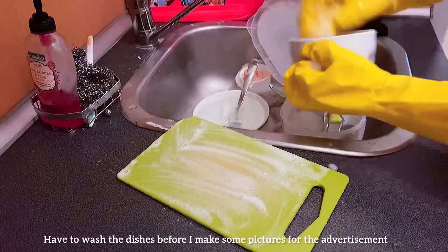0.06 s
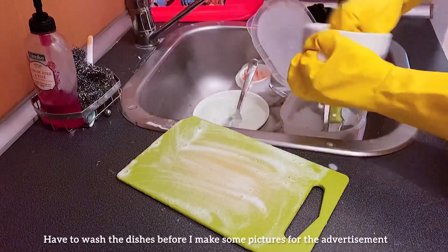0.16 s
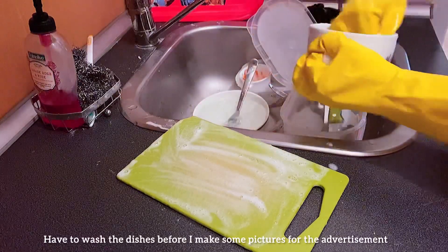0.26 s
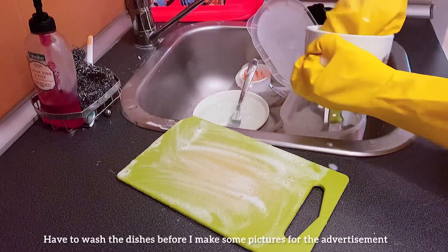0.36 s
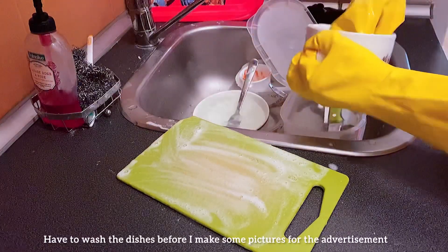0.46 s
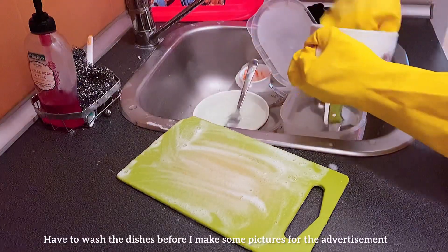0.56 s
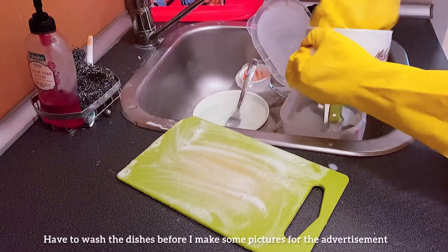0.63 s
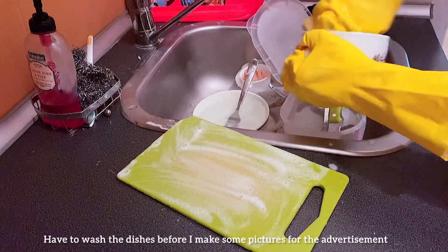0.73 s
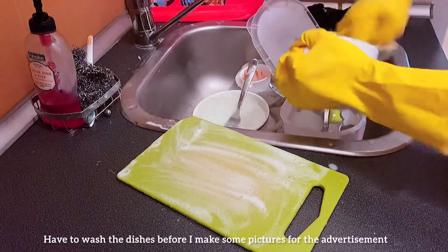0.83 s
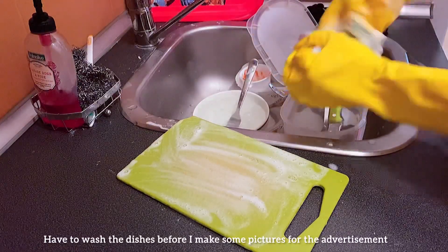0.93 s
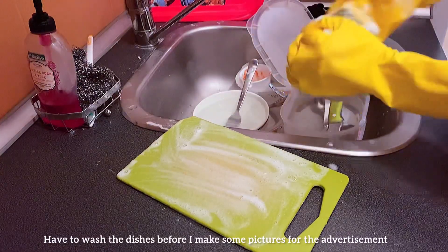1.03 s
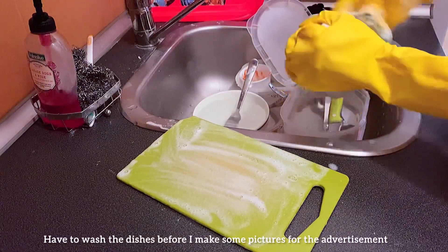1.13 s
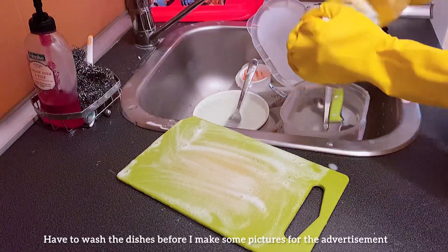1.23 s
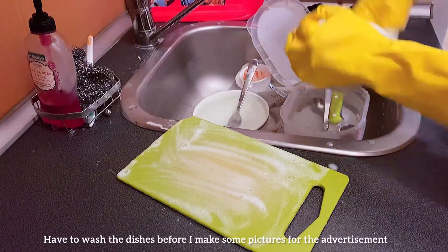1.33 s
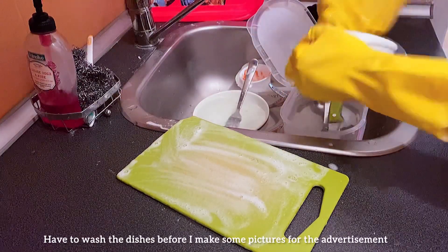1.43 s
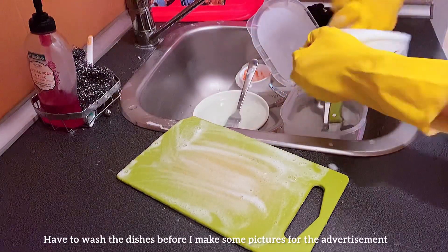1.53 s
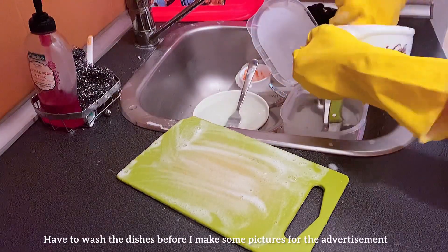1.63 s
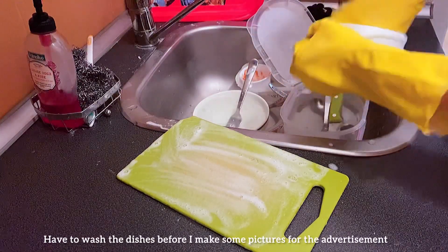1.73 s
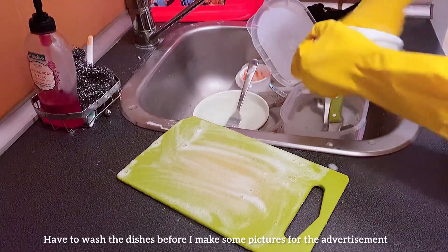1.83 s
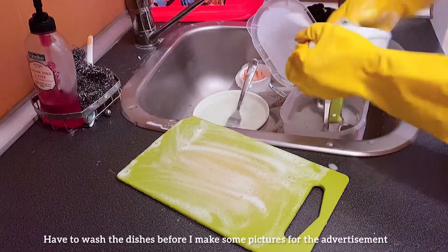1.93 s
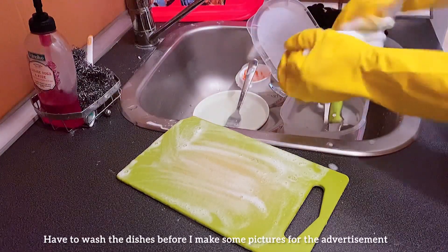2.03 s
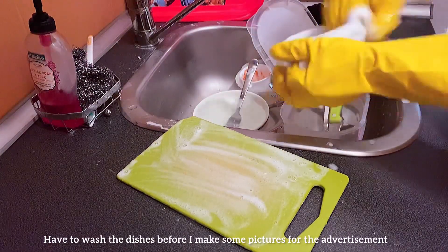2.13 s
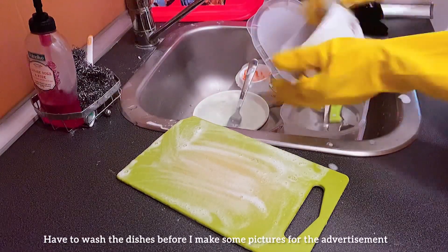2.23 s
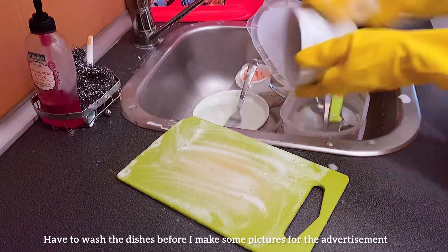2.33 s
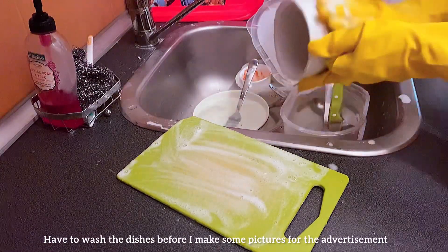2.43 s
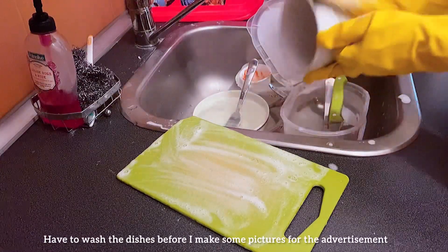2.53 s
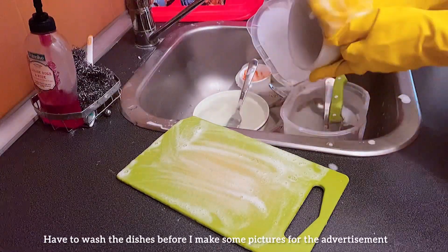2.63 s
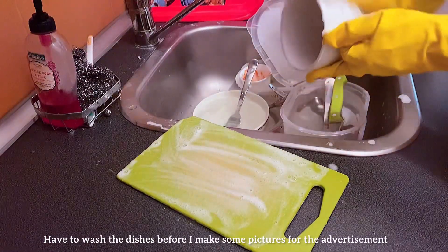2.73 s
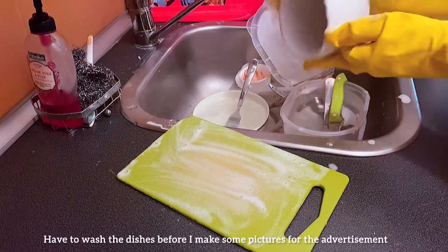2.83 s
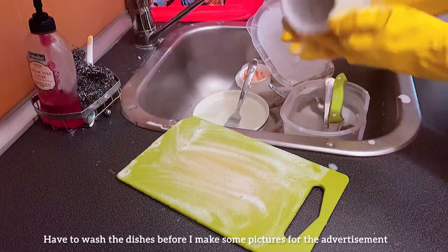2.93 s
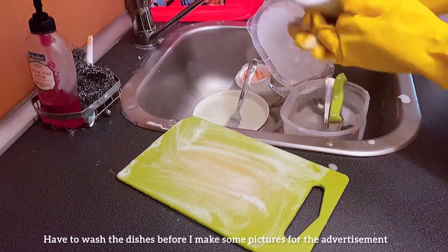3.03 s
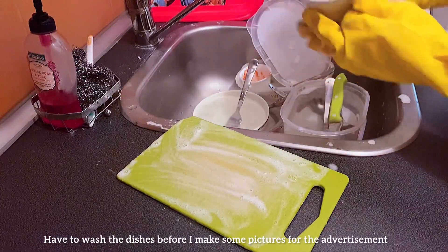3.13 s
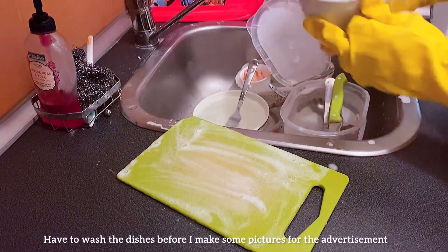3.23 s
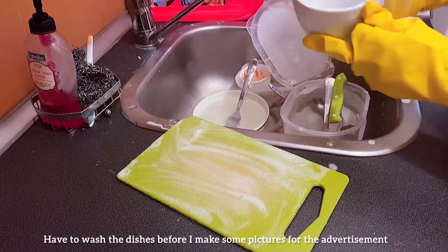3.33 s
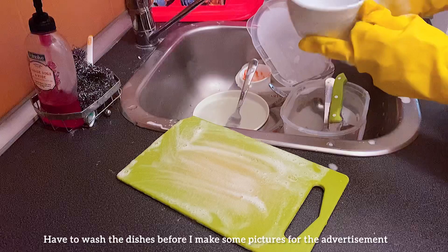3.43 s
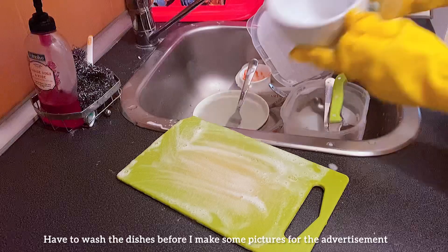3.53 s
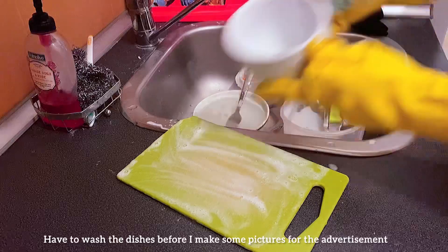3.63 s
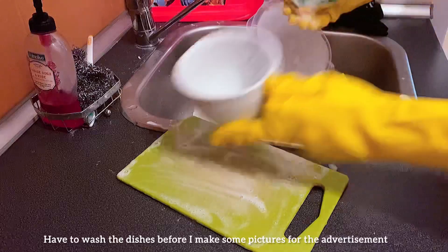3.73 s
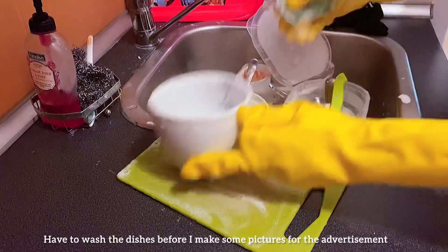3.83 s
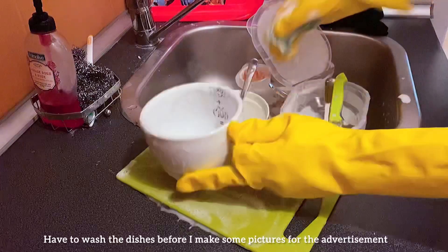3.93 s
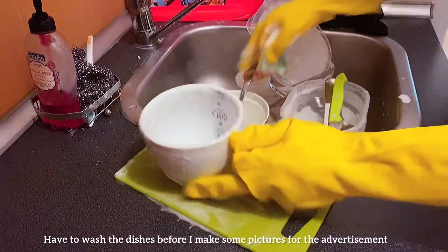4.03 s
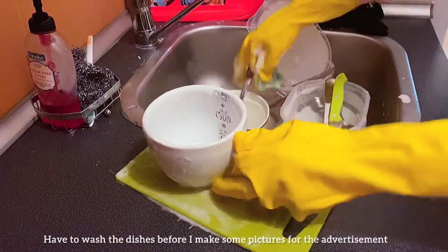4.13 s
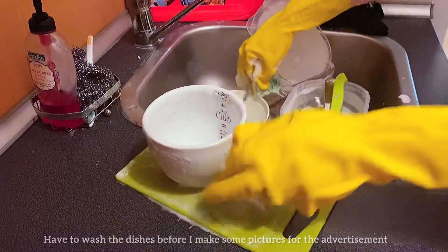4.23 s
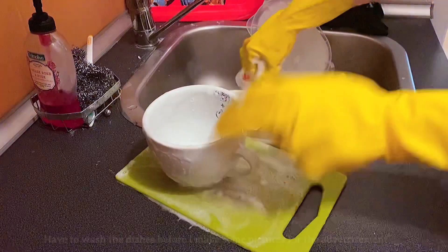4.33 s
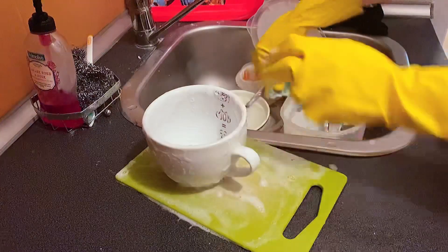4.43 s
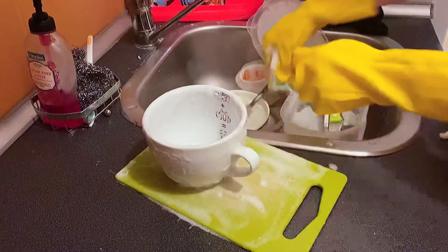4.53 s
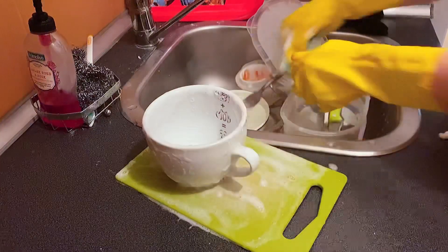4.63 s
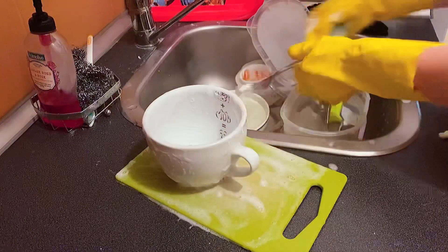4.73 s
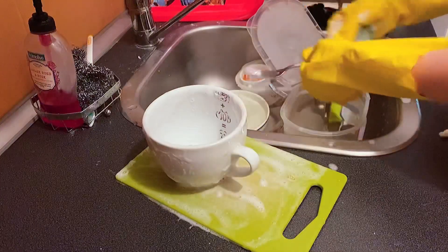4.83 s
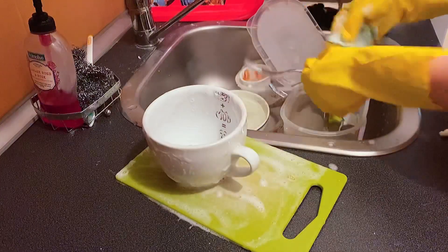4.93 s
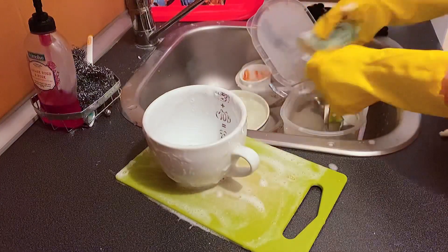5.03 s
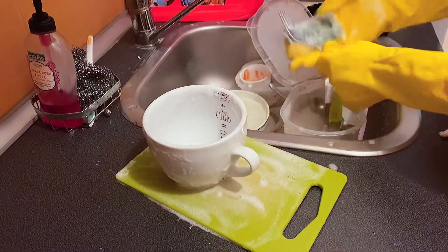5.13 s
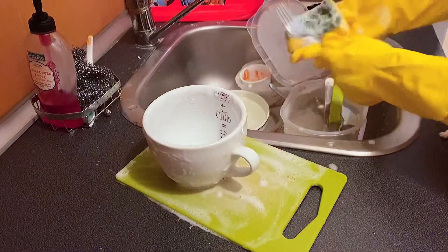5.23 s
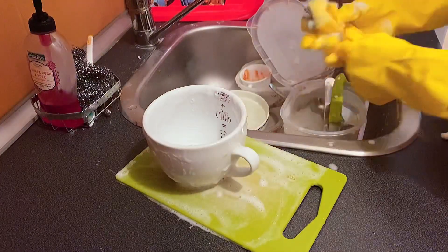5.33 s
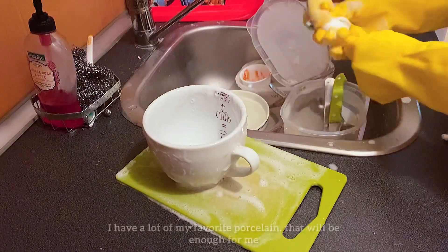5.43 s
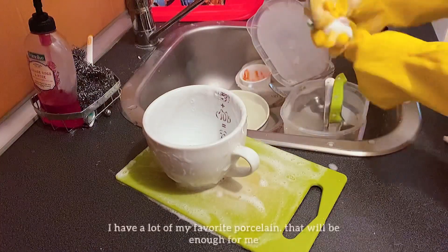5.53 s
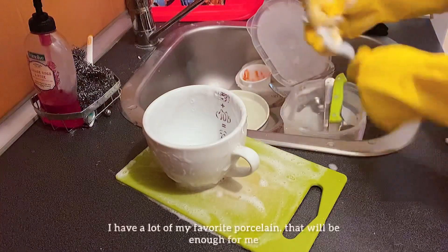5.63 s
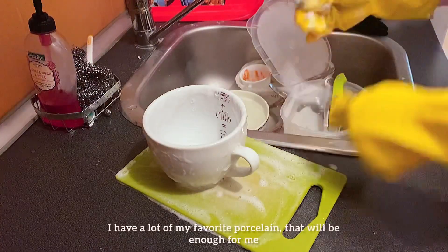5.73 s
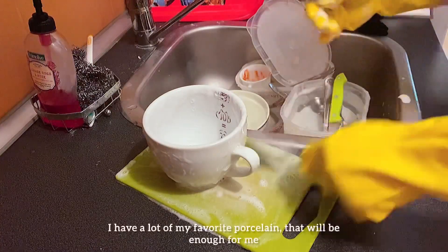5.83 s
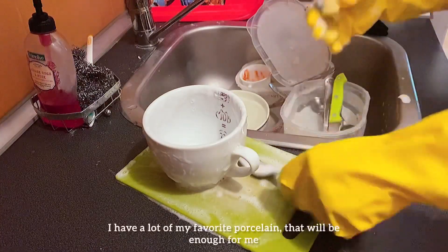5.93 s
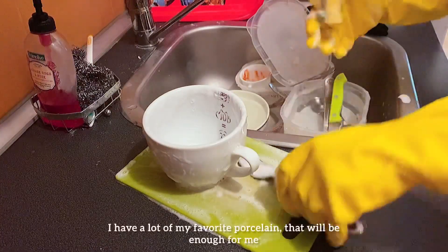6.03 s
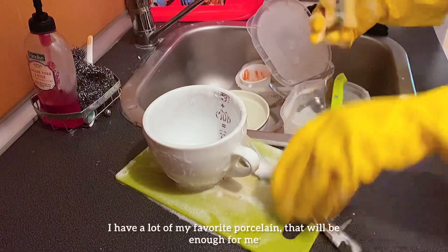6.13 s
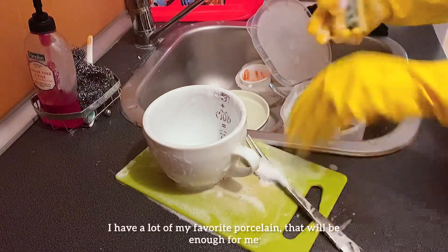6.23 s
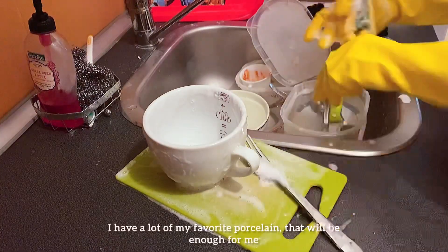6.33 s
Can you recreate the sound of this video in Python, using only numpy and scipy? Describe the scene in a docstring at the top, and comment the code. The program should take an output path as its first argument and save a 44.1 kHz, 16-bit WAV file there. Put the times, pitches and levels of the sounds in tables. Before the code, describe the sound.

A wet sponge scrubs a porcelain cup in squeaky, foamy strokes, then the cup knocks onto a plastic board, a fork clinks, and cutlery clatters down.

```python
"""Washing up at a kitchen sink

Gloved hands work a soapy sponge over a porcelain cup, then over cutlery: grains of noise swell with each stroke,
foam squelches as gliding narrow noise, and suds snap and pop. The cup is set down on a plastic board on the worktop,
a fork clinks against a dish as it is picked up, and the cutlery is dropped beside the cup: struck modes
with noisy cracks. A short dense echo and a quiet room tone surround it all."""
import sys
import numpy as np
from scipy import signal
from scipy.fft import rfft, irfft
from scipy.io import wavfile

SR = 44100
rng = np.random.default_rng(int(sys.argv[2]) if len(sys.argv) > 2 else 0)


def waveform_to_disk(signal):
    """Save audio, clipped to [-1, 1], as 16-bit WAV at the path in sys.argv[1]."""
    frames = np.transpose(np.atleast_2d(signal))
    scaled = np.clip(frames, -1, 1) * 32767
    samples = np.round(scaled).astype(np.int16)
    wavfile.write(sys.argv[1], SR, samples)


N = 281358
TIME = np.arange(N) / SR


def sponge(patchy_db, judder_db, fizz_growth, body_db, rub_db, hiss_db, fizz_db, suds_db):
    """Pores slip and foam bursts in dense grains; hard squeezes add a fine fizz on top."""
    # Spectrum of the wet sponge. Each row: frequency in Hz, relative level in dB per Hz.
    sponge_spectrum = [(90, 0.5), (190, -4.5), (260, -16.5), (480, -0.5), (800, 18), (1250, 14), (1800, 21),
                       (4400, 14), (7500, 5.5), (11000, -17.5), (16000, -41)]
    # Low body of the rubbing. Each row: time in seconds, relative level in dB.
    body_levels = [(.1, -4.5), (.55, -0.5), (1.0, -7), (1.35, -4.5), (2.3, -7), (3.3, -12), (3.68, -30),
                   (4.0, -11.5), (4.9, -3), (5.8, -10.5)]
    # Bursting micro-bubbles. Each row: frequency in Hz, relative level in dB.
    fizz_spectrum = [(5000, -22), (11000, 0.5), (16000, -14)]
    level, hiss = scrubbing()
    body = np.interp(TIME, *np.transpose(body_levels))
    judder = judder_db * drift(70)   # rubber and sponge stick and slip
    foam = [coloured(grains(3500, 2.85), sponge_spectrum) for _ in range(2)]

    def zone(low_hz, high_hz, count):
        """Neighbouring pore sizes swell and fade on their own."""
        edges = np.geomspace(low_hz, high_hz, count + 1)
        total = 0
        for k in range(count):
            patch = band(foam[k % 2], edges[k], edges[k + 1])
            total = total + patch * from_db(patchy_db * drift(50))
        return rms_one(total)

    low = from_db(body + body_db) * zone(109, 406, count=3)
    rub = from_db(rub_db) * zone(388, 4090, count=8)
    high = from_db(hiss + hiss_db) * zone(3970, 8070, count=4)
    # the fizz falls off faster than the rubbing when the pressure eases
    fizz_level = hiss + fizz_db + fizz_growth * (level - level.max())
    fizz = from_db(fizz_level) * coloured(grains(2700, 2.2), fizz_spectrum)
    suds = bubbles(per_s=220, low_hz=928.3, high_hz=5940, cycles=46, rise=0.13, spread_db=17)
    return from_db(level + judder) * (low + hollow() + rub + high + fizz + from_db(suds_db) * suds)


def scrubbing():
    """Strokes add up in power over the light resting contact; gives rubbing level and relative foam hiss in dB."""
    # Strokes of the sponge. Each row: start in seconds, length of the push in seconds,
    # rubbing level in dB, foam hiss relative to it in dB.
    strokes = [(.055, 0.12, -49.5, -5), (.172, 0.17, -50.5, -6.5), (0.476, 0.075, -43, -3),
               (.615, 0.045, -48.5, -2), (.715, 0.11, -50, -5.5), (0.954, 0.048, -49, -5),
               (1.22, 0.18, -50.5, -8.5), (1.435, 0.025, -59.5, -21), (1.635, 0.056, -56.5, -1),
               (1.768, 0.067, -48, -10.5), (1.885, 0.078, -51.5, -6), (1.97, 0.16, -47.5, -11.5),
               (2.135, .09, -48, -0.5), (2.228, 0.091, -42, -5), (2.375, 0.084, -50, -3.5),
               (2.542, 0.037, -48.5, -6), (2.8, 0.2, -46, -7), (3.018, 0.037, -47.5, -7),
               (3.143, 0.16, -48, -4.5), (3.462, 0.052, -53, -2), (3.628, 0.055, -52.5, -0.5),
               (3.89, 0.14, -48, -8), (4.145, 0.05, -51, -12), (4.67, 0.23, -58.5, -5.5),
               (4.88, 0.032, -46.5, -7.5), (5.052, 0.02, -49, -6), (5.118, 0.14, -50.5, -5.5),
               (5.293, 0.027, -48.5, -4), (5.35, 0.24, -57.5, -22), (5.655, 0.35, -52.5, -8),
               (5.975, .09, -49, -4.5)]
    # Between strokes the sponge stays on the cup, pressed harder for a while, then on the cutlery.
    # Each row: start in seconds, end in seconds, rubbing level in dB.
    contacts = [(0, 3.55, -60.5), (0.469, 0.857, -59), (4.66, 5.8, -60.5)]
    contact_hiss_db, contact_fade_s = -5.5, 0.013
    resting = 0
    for start, end, db in contacts:
        fade = np.clip(np.minimum(TIME - start, end - TIME) / contact_fade_s, 0, 1)
        resting = resting + from_db(db) * fade
    rub = resting ** 2 + 1e-12
    hiss = rub * from_db(contact_hiss_db) ** 2
    for s, length, db, hiss_db in strokes:
        power = (from_db(db) * push(s, length)) ** 2
        rub = rub + power
        hiss = hiss + power * from_db(hiss_db) ** 2
    return 10 * np.log10(rub), 10 * np.log10(hiss / rub)


def push(start, length):
    """Pressure of one stroke: it builds up, eases a little and lets go."""
    attack_s = min(0.03, 0.39 * length)   # a short push builds up within this share of its length
    sag_db_per_s, release_db_per_s = 4, 221.5
    t = np.maximum(TIME - start, 0)
    rise = np.sin(np.pi / 2 * np.minimum(t / attack_s, 1)) ** 2
    fall_db = sag_db_per_s * t + release_db_per_s * np.maximum(t - length, 0)
    return rise * from_db(-np.minimum(fall_db, 200))


def hollow():
    """Rubbing excites the air in the cup, a narrow ring of noise; the moving hand retunes it."""
    # The cup's ring while the sponge is inside it. Each row: time in seconds, relative level in dB.
    ring_levels = [(.6, -12), (.85, -8), (1.8, -6), (2.6, -32), (3.6, -45)]
    centre_hz, half_width_hz = 792, 47
    wander = 0.041   # typical share by which the hand shifts the pitch
    hz = centre_hz * (1 + wander * drift(7.2))
    flutter = signal.lfilter(*signal.butter(2, half_width_hz, fs=SR), rng.standard_normal((2, N)))
    ring = np.real((flutter[0] + 1j * flutter[1]) * np.exp(2j * np.pi * np.cumsum(hz) / SR))
    return from_db(np.interp(TIME, *np.transpose(ring_levels))) * rms_one(ring)


def bubbles(per_s, low_hz, high_hz, cycles, rise, spread_db):
    """Larger suds pop one by one, each a short ring rising in pitch; rms 1."""
    out, t = np.zeros(N + SR), TIME[:SR // 25]
    for when, pitch, size in rng.random((int(per_s * N / SR), 3)):
        hz = low_hz * (high_hz / low_hz) ** pitch
        t60 = cycles / hz
        glide = hz * (1 + rise * np.minimum(t / t60, 1))
        pop = np.sin(2 * np.pi * np.cumsum(glide) / SR) * decay(t, t60)
        start = int(when * N)
        out[start:start + len(t)] += from_db(spread_db * size) * pop
    return rms_one(out[:N])


def squelches(width):
    """A closing pocket of foam rings roughly, its pitch gliding as it changes size."""
    # Air squeezed through wet foam. Each row: start in seconds, length in seconds,
    # start pitch in Hz, end pitch in Hz, level in dB.
    pockets = [(0.273, 0.013, 2180, 1610, -47.5), (1.447, 0.089, 5490, 4350, -57),
               (1.505, 0.03, 2400, 1755, -53.5), (1.646, 0.012, 570, 485, -47.5),
               (2.098, 0.017, 1198, 840, -43.5), (2.561, 0.036, 1937, 2246, -53),
               (2.94, 0.037, 1523, 2000, -51), (3.112, 0.0093, 1810, 1960, -49),
               (3.179, 0.063, 1526, 2440, -48), (3.938, 0.043, 4710, 7500, -49.5),
               (5.739, 0.12, 1237, 990, -50), (5.996, 0.08, 2560, 2430, -64)]
    out = np.zeros(N)
    for s, length, start_hz, end_hz, db in pockets:
        count = int(length * SR)
        hz = np.geomspace(start_hz, end_hz, count)
        soft = signal.butter(2, width * start_hz, fs=SR)
        # only the settled end of the filtered noise is used
        flutter = signal.lfilter(*soft, rng.standard_normal((2, SR // 4)))[:, -count:]
        tone = np.real((flutter[0] + 1j * flutter[1]) * np.exp(2j * np.pi * np.cumsum(hz) / SR))
        add(out, s, from_db(db) * rms_one(tone * signal.windows.tukey(count, .7)))
    return out


def snaps(t60):
    """Wet rubber lets go with a short broad tick of noise."""
    # Wet snaps of glove and suds. Each row: start in seconds, peak level in dB, centre frequency in Hz.
    ticks = [(0.2137, -34.5, 2850), (.311, -36, 4000), (0.531, -31.5, 487), (1.654, -36.5, 594),
             (1.789, -37.5, 1600), (2.052, -29.5, 3640), (2.104, -34, 1050), (2.167, -35, 695),
             (2.276, -29, 2110), (3.113, -37.5, 1420), (4.005, -38, 2900), (5.058, -46, 3950),
             (5.1369, -38, 1830)]
    out, t = np.zeros(N), TIME[:SR // 10]
    for s, db, hz in ticks:
        tick = band(rng.standard_normal(len(t)) * decay(t, t60), hz / 2, hz * 2)
        add(out, s, from_db(db) * tick / np.abs(tick).max())
    return out


def board():
    """The cup and the cutlery knock on the plastic board, which rings briefly."""
    # Knocks on the board. Each row: start in seconds, level in dB, contact brightness in Hz.
    knocks = [(3.8068, -2.5, 1670), (3.8128, -7, 4140), (3.877, -19.5, 2500), (3.882, -16.5, 5940),
              (3.985, -26.5, 1320), (5.8142, -3.5, 2360), (5.8212, -7.5, 1320), (6.0044, -31, 2980),
              (6.078, -18, 2980)]
    # Modes of the board with the cup on it. Each row: frequency in Hz, level in dB, t60 in seconds.
    modes = [(697, -30, .06), (790, -24, 0.054), (997, -23.5, 0.078), (1038, -27, .1), (994, -4, 0.04),
             (1085, -21, 0.04), (1770, -14.5, 0.024), (2240, -4.5, 0.0048), (5800, -8, 0.0088)]
    # Spectrum of its crack. Each row: frequency in Hz, relative level in dB.
    crack = [(200, -22), (700, 4), (1100, -7.5), (2500, -6.5), (5500, -5.5), (9000, -18), (16000, -2.5)]
    return strikes(knocks, modes, split=0.011) + cracks(knocks, crack, level_db=-10.0, t60=0.11)


def worktop():
    """The worktop and basin give under a load and boom in low modes."""
    # Thumps. Each row: start in seconds, level in dB, contact brightness in Hz.
    thumps = [(3.814, -15.5, 175), (3.885, -23, 178), (4.005, -39.5, 167), (4.2, -42.5, 135),
              (4.44, -39.5, 85), (4.543, -34.5, 99), (5.828, -33, 200), (6.083, -27, 182)]
    # Modes of worktop and basin. Each row: frequency in Hz, level in dB, t60 in seconds.
    modes = [(53, -9.5, 0.37), (83.8, -1.5, 0.16), (95.5, -3.5, 0.33), (115.3, 5.5, 0.14), (163, -5, 0.16),
             (202.4, -1.5, 0.22), (252, -12, 0.065), (339, -9, 0.55)]
    # Spectrum of the crack. Each row: frequency in Hz, relative level in dB.
    crack = [(100, -3), (250, -2), (450, -7), (800, 2), (2000, -26)]
    return strikes(thumps, modes, split=0.016) + cracks(thumps, crack, level_db=2.5, t60=0.15)


def fork():
    """The fork clinks against a dish and rings in bright steel modes."""
    # Clinks. Each row: start in seconds, level in dB, contact brightness in Hz.
    clinks = [(4.196, -43.5, 4800), (4.324, -41, 8500), (4.3447, -18, 10800), (4.348, -12.5, 9900)]
    # Modes of the fork. Each row: frequency in Hz, level in dB.
    modes = [(1140, -17.5), (3908, -38.5), (4110, -15), (4168, -13.5), (4310, -10), (4550, -28.5),
             (5150, -22.5), (5905, -19.5), (6170, -0.5), (6225, 2), (6310, -4.5), (6390, -25), (6643, -16),
             (6820, -21.5), (8020, -15.5), (8600, -15), (9480, -20), (11500, -20.5), (14530, -25)]
    # Spectrum of the crack. Each row: frequency in Hz, relative level in dB.
    crack = [(400, -10), (1500, -8.5), (2600, -2.5), (4700, 8), (7000, -8), (8800, -13.5), (10000, -16.5),
             (11500, -6), (16000, -18)]
    ring = strikes(clinks, damped(modes, t60=0.18), split=0.003)
    return ring + cracks(clinks, crack, level_db=-6.5, t60=0.097)


def cutlery():
    """The tip of the cutlery chatters as it lands, ringing with the board beneath it."""
    # Chatter of the tip. Each row: start in seconds, level in dB, contact brightness in Hz.
    chatter = [(5.825, -21.5, 11800), (5.831, -21.5, 11900), (5.841, -31, 9000), (5.852, -26.5, 12200),
               (5.865, -29, 12000), (6.012, -39, 14400), (6.0803, -24.5, 7500)]
    # Modes of cutlery and board. Each row: frequency in Hz, level in dB.
    modes = [(175, -2.5), (608, -31), (689, -11.5), (1680, -11.5), (1880, -11), (2050, -10.5),
             (3133, -21.5), (3741, -16), (4404, -12), (4650, -18), (5464, -15), (5879, -12), (6126, -6.5),
             (6266, -31), (7321, -20), (8253, -20), (9900, -17), (10300, -9.5), (10920, -11.5),
             (12200, -11), (12800, -10), (15700, -15)]
    # Spectrum of the crack. Each row: frequency in Hz, relative level in dB.
    crack = [(250, 4), (500, 5.5), (1800, 1.5), (7000, -12.5), (16000, -27)]
    ring = strikes(chatter, damped(modes, t60=0.097), split=0.00815)
    return ring + cracks(chatter, crack, level_db=-6.5, t60=0.097)


def handle():
    """The handle slaps down with a short ring and a mid-heavy crack."""
    # Slaps of the handle. Each row: start in seconds, level in dB, contact brightness in Hz.
    slaps = [(6.0766, -13, 9100), (6.0803, -13.5, 12000), (6.0835, -16.5, 7000), (6.1, -21.5, 6000)]
    # Modes of the handle. Each row: frequency in Hz, level in dB.
    modes = [(738, -17), (1044, -12), (1249, -15.5), (2024, -16), (2633, -8.5), (3133, -10.5), (4161, -14),
             (5900, -20), (10700, -22), (14300, -26)]
    # Spectrum of the crack. Each row: frequency in Hz, relative level in dB.
    crack = [(200, 4), (1100, 12.5), (1900, 7), (2900, 19), (6000, 7), (10000, -6), (16000, -4)]
    ring = strikes(slaps, damped(modes, t60=0.078), split=0.014)
    return ring + cracks(slaps, crack, level_db=-5.5, t60=0.058)


def damped(modes, t60):
    """Whatever holds a piece of steel damps all its modes alike."""
    return [(hz, db, t60) for hz, db in modes]


def strikes(blows, modes, split):
    """Each blow rings every mode, give or take a decibel; a soft contact spares the high ones."""
    out, t = np.zeros(N), TIME[:SR // 2]
    hz, mode_db, t60 = np.transpose(modes)[:, :, None]
    for s, db, bright_hz in blows:
        gain = from_db(db + mode_db + rng.standard_normal(hz.shape)) / np.hypot(1, (hz / bright_hz) ** 2)
        # shifting support splits each mode into a beating cluster
        detunes = split * rng.standard_normal((3, *hz.shape))
        swing = np.mean(np.sin(2 * np.pi * hz * (1 + detunes) * t), axis=0)
        onset = 1 - np.exp(-2 * hz * t)
        add(out, s, np.sum(gain * swing * onset * decay(t, t60), axis=0))
    return out


def cracks(blows, spectrum, level_db, t60):
    """The crowd of small, heavily damped modes that each blow excites, as a burst of decaying noise."""
    out, t = np.zeros(N), TIME[:SR // 4]
    for s, db, bright_hz in blows:
        burst = coloured(rng.standard_normal(len(t)), spectrum) * decay(t, t60)
        soft = signal.butter(2, min(bright_hz, SR / 2 - 1000), fs=SR)
        add(out, s, from_db(db + level_db) * signal.lfilter(*soft, burst))
    return out


def kitchen(x, send, width, first_echo_s):
    """Close walls return a dense echo, weaker toward the treble and a little different at each port."""
    # The kitchen's echo. Each row: frequency in Hz, level in dB, t60 in seconds.
    echo_bands = [(60, -24, 0.12), (288, -0.5, 0.33), (946, -3.5, 0.29), (3124, -9.5, 0.27),
                  (6370, -10, 0.36), (15000, -24.5, 0.18)]
    # Standing waves between the walls and in the basin. Each row: frequency in Hz, level in dB, t60 in seconds.
    standing_modes = [(95.7, -7, 0.49), (332, -0.5, 0.15)]
    t, echo = TIME[:SR // 2], 0
    edges = 40 * 2.0 ** np.arange(10)   # octaves
    white = rng.standard_normal((2, 2, len(t)))
    for k, (low, high) in enumerate(zip(edges, edges[1:])):
        hz = np.sqrt(low * high)
        envelope = decay(t, at_hz(echo_bands, hz, order=2)) * np.clip(t / first_echo_s - 1, 0, 1)
        tail = white[k % 2] * envelope / np.linalg.norm(envelope)
        echo = echo + from_db(at_hz(echo_bands, hz)) * band(tail, low, high)
    standing = 0
    for hz, db, t60 in standing_modes:
        fall = decay(t, t60)
        standing = standing + 2 * from_db(db) * np.cos(2 * np.pi * hz * t) * fall / fall.sum()
    ports = echo[0] + standing + width * echo[1] * [[1], [-1]]
    return x + signal.fftconvolve(send[None], ports, axes=1)[:, :N]


def room_tone(level_db, width):
    """The quiet air of the kitchen: steady noise, partly different on each side."""
    # Spectrum of the air. Each row: frequency in Hz, relative level in dB per Hz.
    air_spectrum = [(25, -6), (55, 0), (97, 0.5), (270, -16), (800, -14.5), (4700, -20), (7500, -29.5),
                    (9500, -38), (16000, -46)]
    mid, side = [coloured(rng.standard_normal(N), air_spectrum) for _ in range(2)]
    return from_db(level_db) * (mid + width * side * [[1], [-1]])


def at_ports(x, ports):
    """Level and phase differences between left and right."""
    hz = np.fft.rfftfreq(N, 1 / SR)
    half = from_db(at_hz(ports, hz) / 2) * np.exp(.5j * at_hz(ports, hz, order=2))
    return irfft(rfft(x) * np.array([half, 1 / half]), N)


def from_db(db):
    """Decibels to gain."""
    return 10 ** (np.asarray(db) / 20)


def rms_one(x):
    """Scale to unit rms."""
    return x / np.sqrt(np.mean(x ** 2) + 1e-20)


def at_hz(rows, hz, order=1):
    """Read one column of a table along log frequency."""
    rows = np.array(rows)
    return np.interp(np.log(np.maximum(hz, 1)), np.log(rows[:, 0]), rows[:, order])


def coloured(x, spectrum):
    """Give a steady signal a spectrum; rms 1."""
    gain = from_db(at_hz(spectrum, np.fft.rfftfreq(len(x), 1 / SR)))
    return rms_one(irfft(rfft(x) * gain, len(x)))


def band(x, low_hz, high_hz):
    """Causal band-pass."""
    edges = [low_hz, min(high_hz, SR / 2 - 1000)]
    return signal.sosfilt(signal.butter(2, edges, "band", fs=SR, output="sos"), x)


def drift(rate):
    """Slow chance with unit rms, passing a given number of random knots per second."""
    knots = rng.standard_normal(4000)
    return rms_one(np.interp(TIME * rate, np.arange(len(knots)), knots))


def grains(per_s, spread_db):
    """Random clicks of very uneven size; rms 1."""
    sizes = from_db(spread_db * np.minimum(rng.exponential(1, N), 5)) * rng.choice([-1, 1], N)
    return rms_one(sizes * (rng.random(N) < per_s / SR))


def add(out, s, sound):
    """Mix a sound in at a time in seconds."""
    start = round(s * SR)
    out[start:start + len(sound)] += sound[:N - start]


def decay(t, t60):
    """Falls by 60 dB in t60."""
    return np.exp(-np.log(1000) * t / t60)


def scene():
    """Hands and dishes sound in the kitchen; the board lies nearest and so sounds driest."""
    # The board lies to the left. Each row: frequency in Hz, left minus right in dB, left lead in radians.
    board_place = [(590, 1.5, 0), (1000, 4, .6), (2540, -1.5, 1), (6660, -2, 0.47)]
    washing = sponge(patchy_db=2.5, judder_db=2.0, fizz_growth=0.26, body_db=-1.5, rub_db=-4.5,
                     hiss_db=-0.15, fizz_db=-14.5, suds_db=-9.0)
    washing = washing + squelches(width=0.052) + snaps(t60=0.026)
    knocking = board()
    ringing = worktop() + fork() + cutlery() + handle()
    send = from_db(1.0) * washing + ringing + from_db(-4.5) * knocking
    direct = washing + ringing + at_ports(knocking, board_place)
    return kitchen(direct, send, width=1.0, first_echo_s=0.0014) + room_tone(level_db=-57.0, width=0.34)


def record(dry):
    """The left port faces the sink and the two part in phase in the treble; peaks are rounded, bass and top are cut."""
    # The two microphone ports. Each row: frequency in Hz, left minus right in dB, left lead in radians.
    port_balance = [(60, 3.5, 0), (180, 5.5, 0), (700, .7, 0), (1400, 2, 0), (5500, 6.5, 0), (7500, 2, 0),
                    (9000, 0, -3.1), (11200, 0, -6.3), (15000, 0, -12.5)]
    low_cut_hz, cutoff_hz = 40, 15900
    heard = at_ports(dry, port_balance)
    heard = signal.sosfilt(signal.butter(3, low_cut_hz, "high", fs=SR, output="sos"), heard)
    heard = heard / (1 + (heard / .75) ** 6) ** (1 / 6)   # no peak passes 0.75 here
    return signal.sosfilt(signal.ellip(10, .1, 80, cutoff_hz, fs=SR, output="sos"), heard)


dry = scene()
out = record(dry)
waveform_to_disk(out)
```